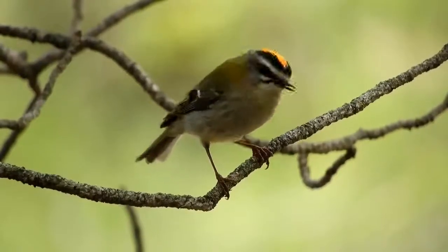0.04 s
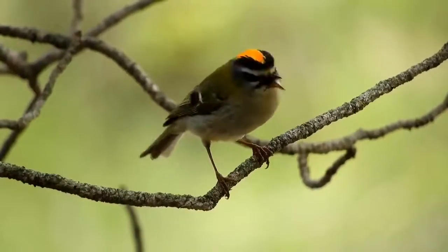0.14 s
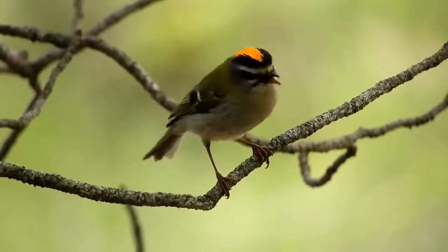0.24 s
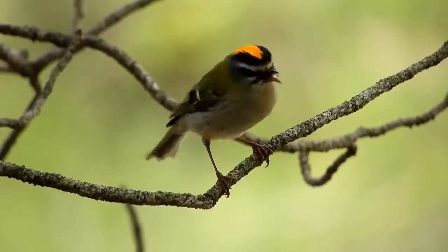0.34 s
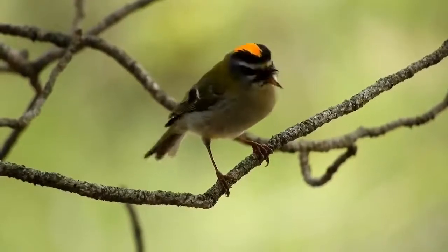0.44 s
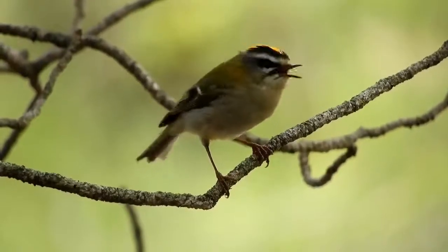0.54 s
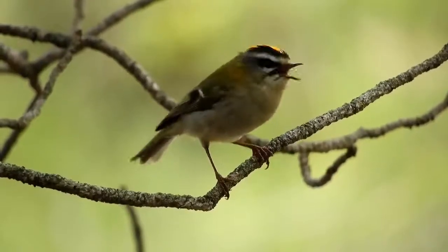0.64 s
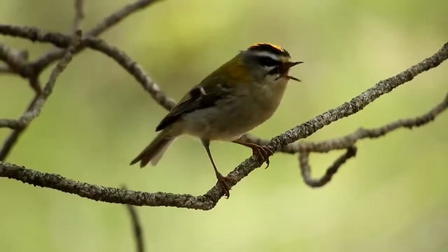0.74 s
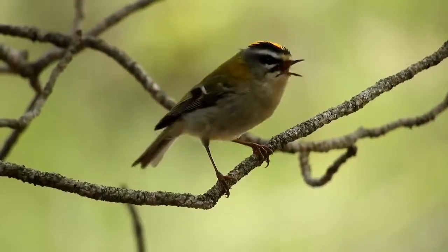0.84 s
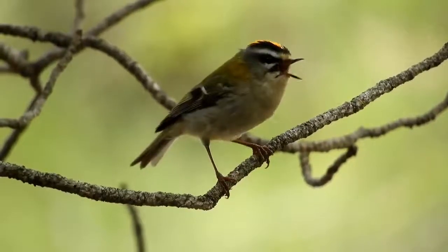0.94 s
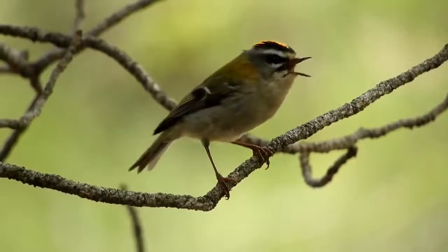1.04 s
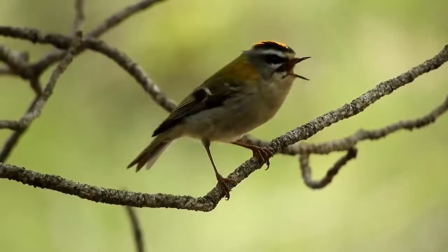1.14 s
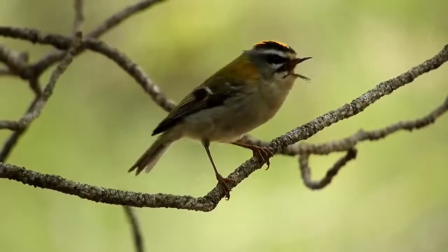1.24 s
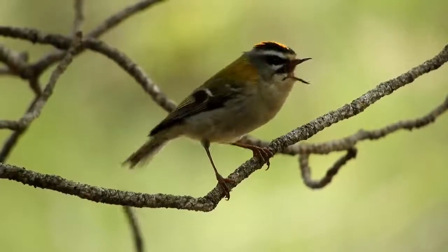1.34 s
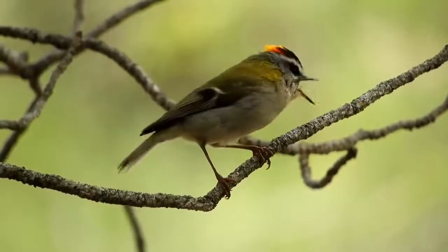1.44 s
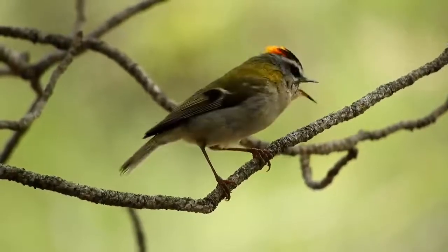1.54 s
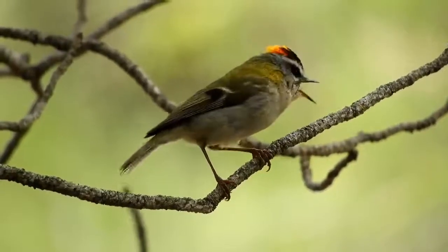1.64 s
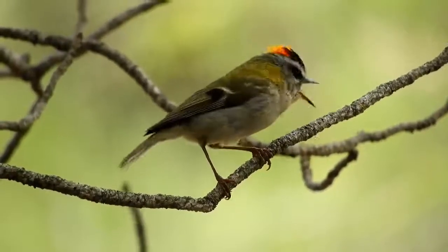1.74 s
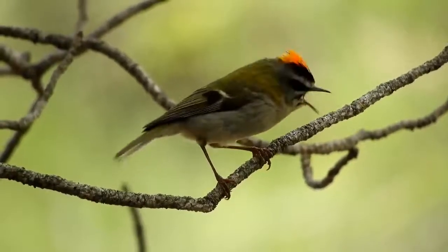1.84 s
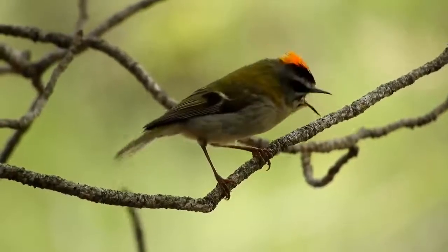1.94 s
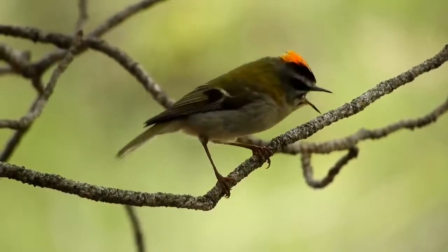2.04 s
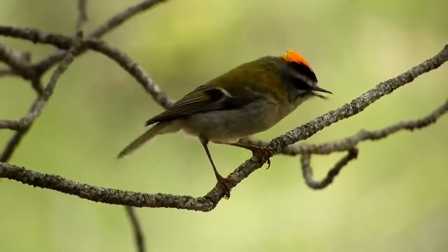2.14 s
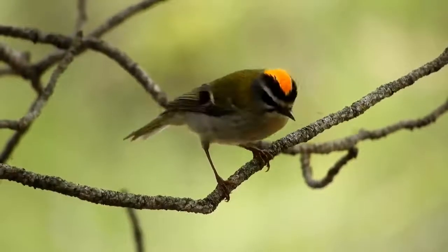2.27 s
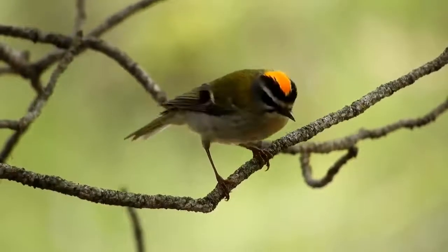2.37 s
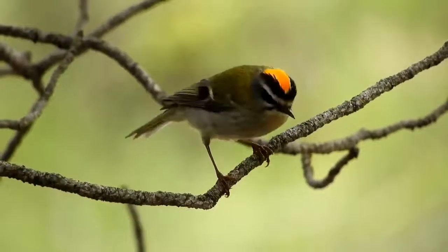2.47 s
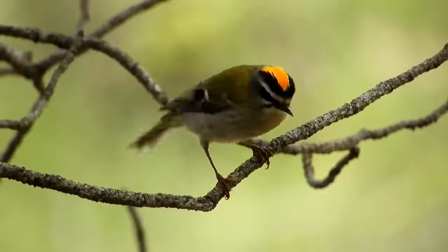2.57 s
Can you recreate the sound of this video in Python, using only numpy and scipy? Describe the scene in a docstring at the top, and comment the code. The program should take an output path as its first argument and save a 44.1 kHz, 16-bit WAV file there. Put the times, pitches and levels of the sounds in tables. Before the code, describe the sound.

Thin, piercing birdsong from a twig close by: rising whistles, then a rapid trilling finish in woodland

```python
"""Thin, high whistles come first, out of soft woodland air: a firecrest sings one song from a twig close by.
The whistles scoop up and mostly swell; two slurs and five warbled notes follow, all unsteady sine tones.
Decaying random reflections make the echo from the trees. Far off, another bird's lower tones glide up
and down, partly blurred by echo. Filtered noise makes the distant hum, hiss, rumbles and chatter."""
import sys
import numpy as np
from scipy import signal
from scipy.fft import rfft, irfft
from scipy.io import wavfile
from scipy.ndimage import uniform_filter1d

SR = 44100
rng = np.random.default_rng(int(sys.argv[2]) if len(sys.argv) > 2 else 0)


def wav_record(signal):
    """Record a signal, one row per channel, as 16-bit PCM in the file named by sys.argv[1]."""
    frames = np.transpose(np.atleast_2d(signal))
    bounded = np.clip(frames, -1, 1)
    # unit amplitude maps onto the largest positive 16-bit level
    quanta = np.round(bounded * 32767).astype(np.int16)
    wavfile.write(sys.argv[1], SR, quanta)


N = 114660  # length of the scene in samples, 2.6 s


def undb(db):
    """Decibels to gain."""
    return 10 ** (np.asarray(db) / 20)


def add(out, start_s, x):
    """Mix x into out from a start time."""
    i = max(int(start_s * SR), 0)
    out[i:i + len(x)] += x[:max(N - i, 0)]


def walk(rate_hz):
    """Smooth random wandering with spread 1; a higher rate wanders faster."""
    k = max(int(SR / rate_hz), 1)
    smooth = uniform_filter1d(uniform_filter1d(rng.standard_normal(N), k), k)
    return smooth / smooth.std()


def pan(left_minus_right_db):
    """Left and right gains for a level difference."""
    return undb(np.array([[1], [-1]]) * left_minus_right_db / 2)


def noise(spectrum, side):
    """Stereo noise with a given spectrum: a middle part of rms 1, plus a side part for width."""
    point_hz, point_db = np.array(spectrum).T
    bin_hz = np.fft.rfftfreq(N, 1 / SR)
    # Straight lines between the points on a log pitch scale, silence above the last one
    gain = undb(np.interp(np.log(bin_hz + 1), np.log(point_hz), point_db, right=-np.inf))
    m, s = irfft(rfft(rng.standard_normal((2, N))) * gain, N)
    stereo = np.array([m + side * s, m - side * s])
    return stereo / m.std()


def swells(rows):
    """Gain curve of bell-shaped swells, each at its loudest at the given time."""
    t = np.arange(N) / SR
    return sum(undb(db) * np.exp(-((t - centre) / width) ** 2) for centre, width, db in rows)


def trees(x, t60_s, side, per_s=SR):
    """Stereo echo from trunks and leaves: separate reflections, or diffuse when there are many."""
    t = np.arange(SR) / SR
    reflections = rng.standard_normal((2, SR)) * (rng.random((2, SR)) < per_s / SR)
    decay = np.exp(-np.log(1000) * t / t60_s)
    tail = reflections * decay * (1 - np.exp(-t / .006))  # builds up over some 6 ms
    tail /= np.sqrt((tail ** 2).sum(axis=1, keepdims=True))  # unit energy
    m, s = signal.fftconvolve(x[None], tail, axes=1)[:, :N]
    return np.array([m + side * s, m - side * s])


def tone(t, pitch_hz, gain, jitter_hz):
    """One note of a syrinx, a bird's voice organ: a slightly unsteady sine with soft ends."""
    attack_s, release_s, shimmer_db = .006, .0065, .35
    ramp = np.clip(np.minimum(t / attack_s, (t[-1] - t) / release_s), 0, 1)
    soft_ends = np.sin(np.pi / 2 * ramp) ** 2
    phase = 2 * np.pi * np.cumsum(pitch_hz + jitter_hz * walk(990)[:len(t)]) / SR
    shimmer = undb(shimmer_db * walk(220)[:len(t)])
    return np.sqrt(2) * gain * soft_ends * shimmer * np.sin(phase)


def background():
    """Shaped noise: a distant hum that slowly rises and falls, thin hiss, low rumble mostly on the right."""
    # Spectra of the hum and air, the hiss and the rumble: pitch_hz [Hz], relative level_db [dB per Hz]
    air_spectrum = [(53, -48), (90, -18.5), (135, -2), (187, 3), (249, -6), (439, -10.5), (834, -13.5),
                    (926, -15.5), (1090, -16), (2110, -19.5), (3200, -19.5), (4160, -54), (7040, -120)]
    hiss_spectrum = [(2500, -32), (3300, 1), (5000, 3.5), (7000, 7.5), (9000, -3), (11000, -6.5),
                     (15000, -7)]
    rumble_spectrum = [(20, -12), (60, -4), (120, 4.5), (170, 4.5), (300, -31)]
    # Slow level changes of the hum and air: time_s [s], added level_db [dB]
    air_swell = [(0, -4.5), (.4, -2.5), (1.0, -2.5), (1.6, 0), (2.1, -0.2), (2.6, -3)]
    # Low rumbles: centre_s [s], width_s [s], level_db before panning [dB]
    rumble_swells = [(.02, .05, -61), (.628, .025, -68)]
    air_db, flutter_db, hiss_db, rumble_floor_db = -59.5, .9, -61, -78.5
    air_side, hiss_side, rumble_pan_db = .77, .53, -18.5
    bass_cut_hz = 83

    t = np.arange(N) / SR
    air_level_db = air_db + np.interp(t, *np.array(air_swell).T) + flutter_db * walk(42)
    air = noise(air_spectrum, air_side) * undb(air_level_db)
    air = signal.sosfilt(signal.butter(2, bass_cut_hz, "high", fs=SR, output="sos"), air)
    hiss = undb(hiss_db) * noise(hiss_spectrum, hiss_side)
    rumble_gain = undb(rumble_floor_db) + swells(rumble_swells)
    rumble = rumble_gain * noise(rumble_spectrum, air_side) * pan(rumble_pan_db)
    return air + hiss + rumble


def far_bird():
    """Lower gliding sine whistles, blurred by the wood between, and noise for distant chatter."""
    # Glides: start_s [s], length_s [s], from_hz [Hz], to_hz [Hz], level_db before flutter and distance [dB]
    glides = [(.206, 0.067, 4870, 4690, -57), (.265, 0.022, 4050, 4490, -53.5),
              (.325, 0.048, 4070, 3440, -58), (.57, 0.11, 4810, 5300, -67.5),
              (.801, .08, 5280, 4900, -66.5), (0.943, 0.12, 3605, 4870, -65),
              (1.12, 0.039, 5060, 4250, -56), (1.168, 0.054, 4260, 3590, -66),
              (1.38, 0.087, 3750, 4296, -61), (1.448, 0.033, 4110, 5060, -54),
              (1.576, 0.023, 5100, 4840, -47), (1.598, 0.051, 4400, 3750, -55.5),
              (1.642, 0.04, 4840, 4640, -57.5), (1.665, 0.082, 3545, 4050, -58),
              (1.755, 0.075, 4900, 5190, -61.5), (1.856, 0.037, 3655, 3774, -50),
              (1.922, 0.0345, 3910, 4850, -50), (2.044, 0.028, 4860, 4780, -45),
              (2.06, 0.041, 4830, 3780, -52.5), (2.07, .17, 4850, 4776, -56.5),
              (2.13, 0.097, 3573, 3855, -60), (2.228, .08, 5010, 5200, -66),
              (2.261, 0.043, 3546, 3594, -56.5), (2.33, .075, 3690, 4250, -59.5),
              (2.398, .032, 4250, 4800, -53.5), (2.442, .045, 4690, 4740, -56),
              (2.498, 0.016, 5560, 6240, -48), (2.524, 0.023, 5390, 4980, -49),
              (2.542, 0.029, 5000, 4100, -48.5)]
    # Fluttering chatter of distant birds: centre_s [s], width_s [s], level_db before flutter [dB]
    chatter_swells = [(.07, .15, -63), (.32, .07, -57), (1.17, .04, -67), (1.58, .04, -53.5),
                      (2.05, .035, -53)]
    # Chatter spectrum: pitch_hz [Hz], relative level_db [dB per Hz]
    chatter_spectrum = [(3300, -40), (4300, -4.5), (5200, -4), (6300, -5), (7500, -28)]
    direct_db, echo_db, echo_t60_s, side = -5.5, -3.5, .26, .77
    waver_hz, steady_share = 100, .3  # flatter glides waver less, down to this share
    flutter_db, chatter_flutter_db = 2.2, 2

    sung = np.zeros(N)
    for start, length, from_hz, to_hz, db in glides:
        t = np.arange(int(length * SR)) / SR
        waver = waver_hz * np.clip(abs(to_hz - from_hz) / 600, steady_share, 1)
        pitch = from_hz + (to_hz - from_hz) * t / length
        gain = undb(db + flutter_db * walk(82)[:len(t)])
        add(sung, start, tone(t, pitch, gain, waver))
    echo = undb(echo_db) * trees(sung, echo_t60_s, side)
    chatter_flutter = undb(chatter_flutter_db * walk(58))
    chatter = noise(chatter_spectrum, side) * swells(chatter_swells) * chatter_flutter
    return undb(direct_db) * sung + echo + chatter


def whistles():
    """Thin notes that scoop up, mostly swell, and sag; the more a note sags, the harder its end is pushed."""
    # Whistles: start_s [s], length_s [s], scoop_time_s [s], pitch_hz before the sag [Hz], sag_hz [Hz],
    # scoop_level_db [dB], peak_level_db before the push [dB], swell_db from start to peak [dB],
    # peak_place [0-1 of the note]
    notes = [ (.018, .068, .001, 7335, 45, -77, -34.5, 32, .72),
             (.174, .074, .001, 7305, 20, -77, -28, 26, .85),
             (.285, .124, .009, 7300, 10, -52, -26, 120, .66),
             (.435, .129, .010, 7300, 15, -37, -23.5, 85, .73),
             (.591, .132, .011, 7315, 20, -37, -21.7, 62, .72),
             (.750, .139, .009, 7355, 45, -31, -21, 35, .76),
             (.917, .150, .0062, 7385, 95, -27.5, -22, 23, .78),
             (1.095, .156, .0055, 7420, 115, -26, -22.3, 17, .85),
             (1.278, .156, .0052, 7515, 195, -28, -24.3, 1, .6),
             (1.467, .150, .0045, 7570, 225, -30, -25, -4, .55),
             (1.641, .066, .005, 7545, 30, -25.5, -22.8, 14, .5)]
    scoop_from_hz, scoop_power, sag_power = 6220, 1.35, 1.2
    scoop_crest, scoop_width = 1.53, .99  # both in scoop times
    push_db_per_hz, push_lead_s, push_width_s = .034, .011, .018  # lead: time before the note's end
    fade_db = 3.5  # fall from the peak to the end

    out = np.zeros(N)
    for start, length, scoop, hz, sag, scoop_db, peak_db, swell, crest in notes:
        t = np.arange(int(length * SR)) / SR
        u = t / length
        scoop_hz = (hz - scoop_from_hz) * np.exp(-(t / scoop) ** scoop_power)
        pitch = hz - scoop_hz - sag * u ** sag_power
        scoop_gain = undb(scoop_db) * np.exp(-((t / scoop - scoop_crest) / scoop_width) ** 2 / 2)
        push = push_db_per_hz * sag * np.exp(-((length - push_lead_s - t) / push_width_s) ** 2)
        before_peak = swell * np.maximum(1 - u / crest, 0) ** 2
        after_peak = fade_db * np.maximum(u - crest, 0) / max(1 - crest, .1)
        body_gain = undb(peak_db + push - before_peak - after_peak)
        add(out, start, tone(t, pitch, np.hypot(scoop_gain, body_gain), 9))  # 9 Hz of jitter
    return out


def flourish():
    """Two slurs, then warbled notes of three crests; the middle crest grows sharper from note to note."""
    # Slurs: start_s [s], length_s [s], from_hz [Hz], to_hz [Hz], glide_time_s [s], level_db [dB]
    slurs = [(1.701, 0.029, 7040, 7985, .016, -26.5), (1.753, 0.0432, 6190, 7260, 0.01, -29.5)]
    # Pitch shape of a warbled note before stretching and scaling: time_s [s], pitch_hz [Hz]
    warble_shape = [(0, 5900), (.004, 7200), (.009, 7880), (.015, 8060), (.020, 7880), (0.025, 7230),
                    (.032, 7750), (0.038, 8150), (0.043, 7700), (0.045, 7260), (0.056, 7800), (.062, 8340),
                    (0.069, 7700), (0.076, 7080), (0.086, 6980)]
    # Warbled notes: start_s [s], length_s [s], stretch of the shape [ratio], depth of the swings [ratio],
    # spike_hz on the middle crest [Hz], shift_hz [Hz], level_db before dips and fade [dB]
    warbles = [(1.8221, 0.079, 0.89, 0.58, 82, -79, -25.5), (1.917, 0.085, 1.01, 0.853, 274, -5.5, -25.5),
               (2.023, .085, 0.99, 0.93, 467, 1, -25), (2.133, 0.084, 1.01, 0.96, 596, 7, -25),
               (2.246, 0.085, .995, 1.03, 690, 29, -25)]
    centre_hz, jitter_hz = 7646, 48
    spike_at_s, spike_width_s = .037, .00243  # before stretching
    rise_s, fade_db, dip_db_per_khz = .0008, 2, 2

    out = np.zeros(N)
    for start, length, from_hz, to_hz, glide, db in slurs:
        t = np.arange(int(length * SR)) / SR
        pitch = to_hz + (from_hz - to_hz) * np.exp(-t / glide)
        add(out, start, tone(t, pitch, undb(db), jitter_hz))
    shape_s, shape_hz = np.array(warble_shape).T
    for start, length, stretch, depth, spike, shift, db in warbles:
        t = np.arange(int(length * SR)) / SR
        curve = uniform_filter1d(np.interp(t / stretch, shape_s, shape_hz), size=70)  # rounds corners
        swing = depth * (curve - centre_hz)
        swing = swing + spike * np.exp(-((t / stretch - spike_at_s) / spike_width_s) ** 2)
        # Softer at the far ends of the pitch swing
        dip = dip_db_per_khz * np.maximum(abs(swing) - 400, 0) / 1000
        fade = fade_db * (t / length - .5)
        gain = undb(db - dip - fade) * (1 - np.exp(-t / rise_s))
        add(out, start, tone(t, centre_hz + shift + swing, gain, jitter_hz))
    return out


def firecrest():
    """The song, faint noisy rasps and the echo from the trees, moving from the right to the centre."""
    # Faint rasps on the highest crests: centre_s [s], width_s [s], level_db before panning [dB]
    rasp_swells = [(1.953, 0.003, -58), (2.060, 0.003, -35), (2.170, 0.003, -44)]
    # Rasp spectrum: pitch_hz [Hz], relative level_db [dB per Hz]
    rasp_spectrum = [(5000, -10), (8500, 21), (10500, -3), (11900, 10), (13000, -28), (15000, -30)]
    # Place of the singer: time_s [s], left_minus_right_db [dB]
    place = [(0, -6.5), (.5, -5), (.8, -5.5), (1.152, -2.5), (1.45, -2.5), (1.78, -2), (2.1, -1.3),
             (2.6, 0)]
    near_db, near_t60_s, twig_echoes_per_s = -13.5, .18, 1100
    wood_db, wood_t60_s, echo_side = -20, .55, .45
    extra_scatter_db = 3.5  # extra echo of the flourish, from the wide-open beak

    opening = whistles()
    ending = flourish()
    sent = opening + undb(extra_scatter_db) * ending
    near_echo = undb(near_db) * trees(sent, near_t60_s, echo_side, twig_echoes_per_s)
    wood_echo = undb(wood_db) * trees(sent, wood_t60_s, echo_side)
    rasps = swells(rasp_swells) * noise(rasp_spectrum, 0)[0]
    left_minus_right_db = np.interp(np.arange(N) / SR, *np.array(place).T)
    return (opening + ending + rasps + near_echo + wood_echo) * pan(left_minus_right_db)


def scene():
    """The wood, the far bird and the near singer together."""
    return background() + far_bird() + firecrest()


def record(dry):
    """The recorder steeply cuts the treble above 15.3 kHz."""
    return signal.sosfilt(signal.ellip(8, .2, 70, 15300, fs=SR, output="sos"), dry)


dry = scene()
out = record(dry)
wav_record(out)
```